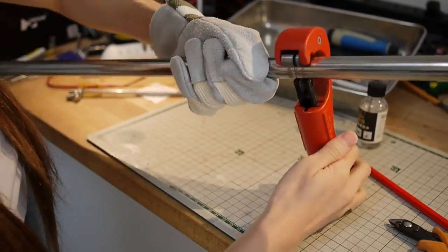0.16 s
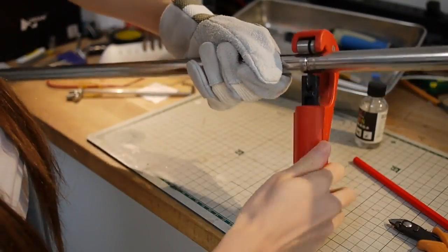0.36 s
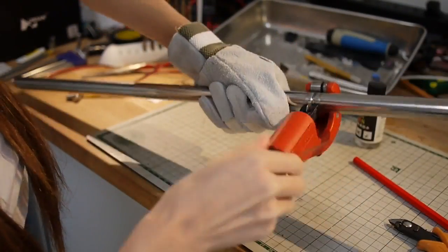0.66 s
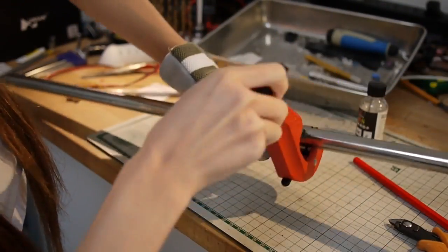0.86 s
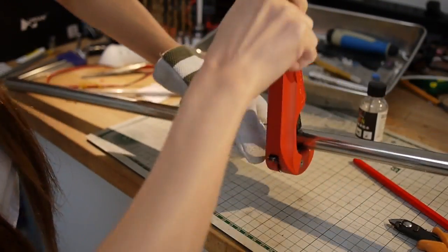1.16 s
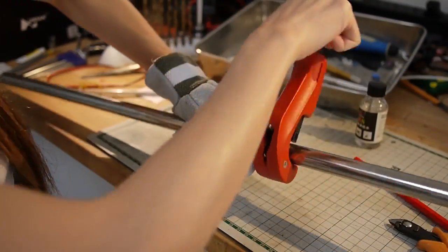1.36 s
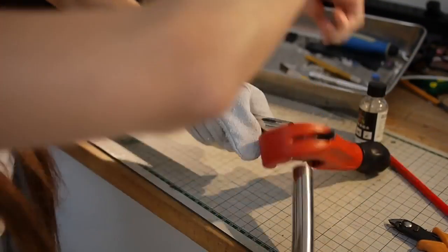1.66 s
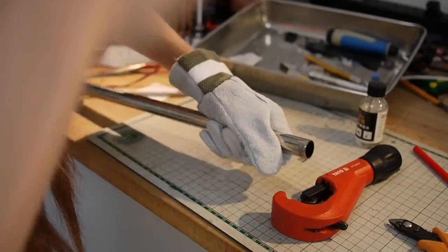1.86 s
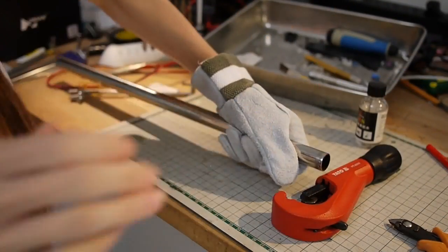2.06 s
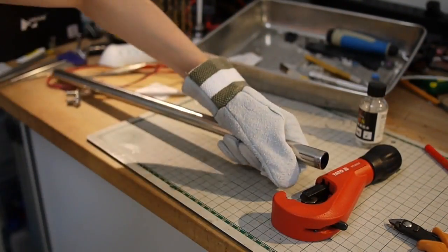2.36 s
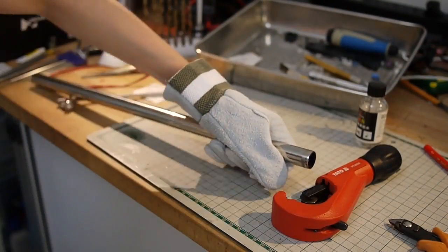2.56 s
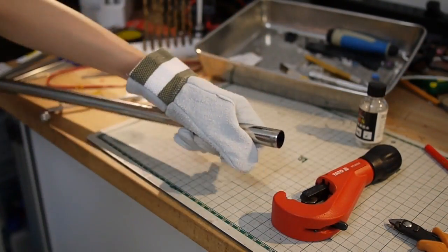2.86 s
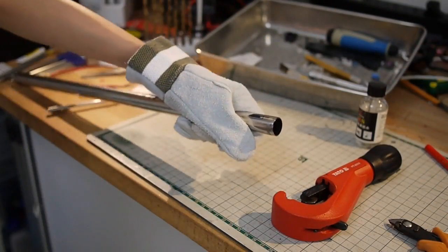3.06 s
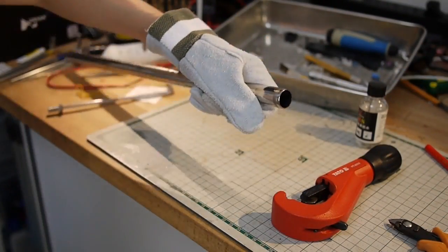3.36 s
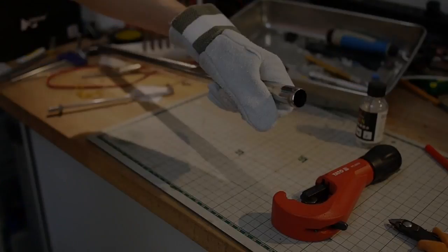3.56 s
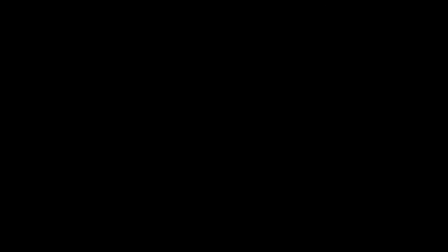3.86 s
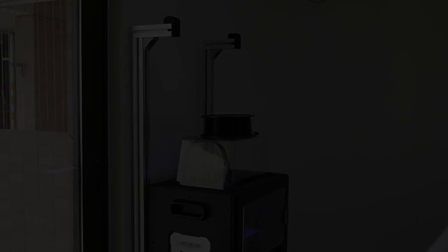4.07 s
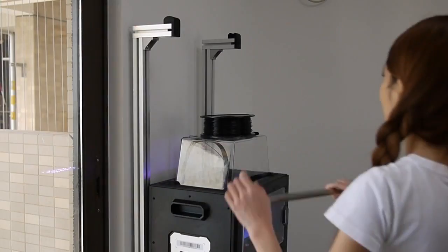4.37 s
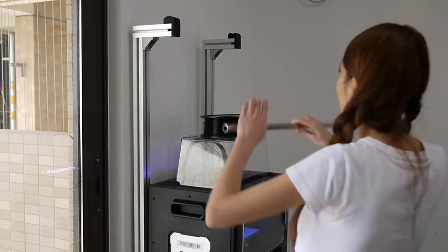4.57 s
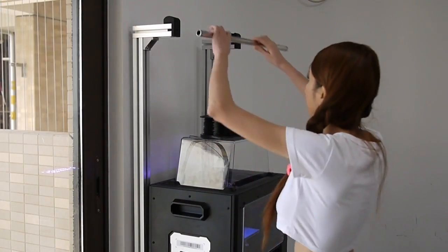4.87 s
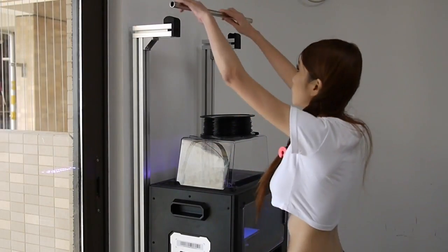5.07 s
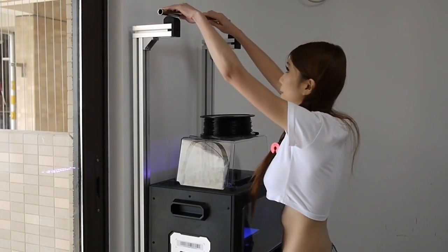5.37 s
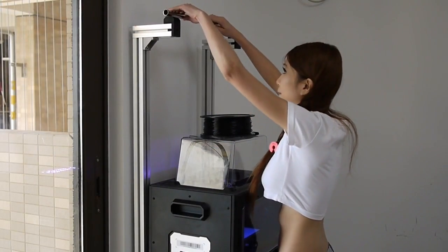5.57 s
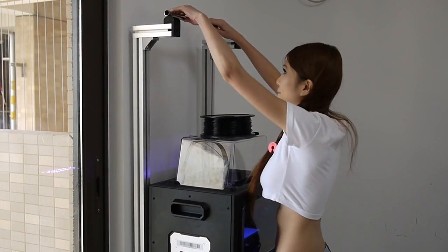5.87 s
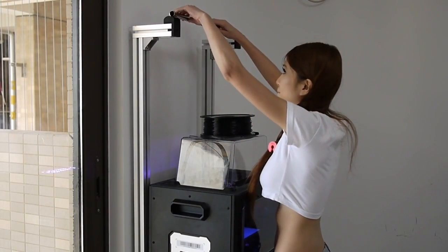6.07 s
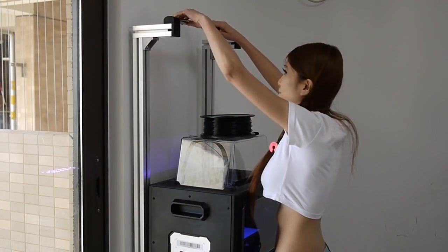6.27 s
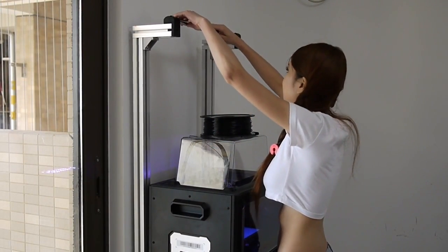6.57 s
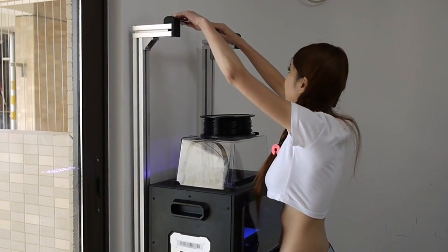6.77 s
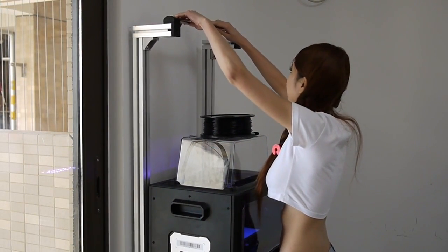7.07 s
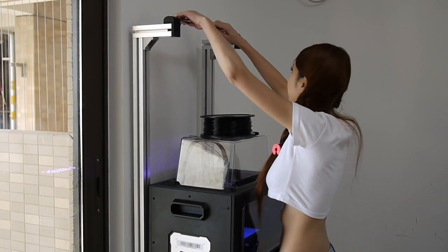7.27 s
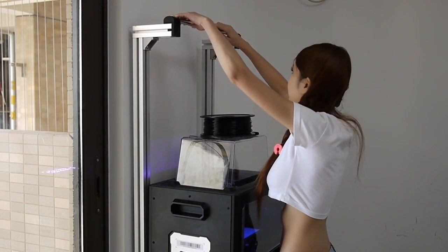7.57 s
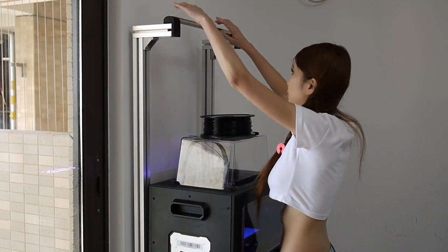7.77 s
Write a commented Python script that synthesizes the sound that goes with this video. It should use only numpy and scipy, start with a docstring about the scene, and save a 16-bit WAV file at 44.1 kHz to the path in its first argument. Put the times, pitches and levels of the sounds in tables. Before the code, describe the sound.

Gritty metal cutting strokes, a bench clatter, a bouncing tube rolling with bright fluttering ringing, then soft reverberant knocks and one snap in a bare room.

```python
"""A rasp comes and goes with sharp clicks, then a clatter, a drop, bounces and a rolling metallic ring.
A hand tube cutter grinds round a steel tube, breaks through and tumbles with it onto a workbench.
The cut-off length bounces and rolls on the floor, ringing with its bending and wall modes.
Then, farther away in a bare room, a tube is fitted onto a metal frame with light knocks.
Filtered noise makes the friction and blows; decaying, fluttering sine modes make the ring."""
import sys
import numpy as np
from scipy import signal
from scipy.fft import rfft, irfft, next_fast_len
from scipy.io import wavfile
from scipy.ndimage import uniform_filter1d, map_coordinates

SR = 44100
rng = np.random.default_rng(int(sys.argv[2]) if len(sys.argv) > 2 else 0)


def put_to_file(sound):
    """Save the sound as 16-bit audio at rate SR, in the file named by the first command-line argument."""
    columns = np.atleast_2d(sound).T  # one column per channel
    safe = np.clip(columns, -1, 1)
    whole_steps = np.round(safe * 32767)
    wavfile.write(sys.argv[1], SR, whole_steps.astype(np.int16))


N = 349272
TIME = np.arange(N) / SR

# the loose tube's modes, one family a line: second bend, first bend, oval, wall, third bend,
# fourth bend, shimmer: (frequency [Hz], relative level [dB])
TUBE_FAMILIES = [
    [(3111, 1.5)],
    [(1151, 2.6)],
    [(4696, -15), (4764, -5.5), (4807, -10.5), (4833, -11), (4909, -14.5), (4955, -10)],
    [(5270, -9), (5320, -1.5), (7838, -8.5), (8539, 1.5)],
    [(5825, 1), (5973, -12.5), (6030, -15)],
    [(7092, -1), (9035, -7), (9075, 2.5), (9117, -10.5), (10212, -15), (10296, -8)],
    [(12172, -5.5), (12274, 2.5), (12694, -5), (13330, -15), (13404, -13), (13534, 0.5), (13975, -19.5),
     (14093, -9), (14427, -22), (14850, -12.5)],
]
# how hard the tube rolls on the floor: (time [s], relative level [dB])
ROLL_FORCE = [(2.2, -33.5), (2.95, -15.5), (3.15, -7), (3.45, -2), (3.72, 0.5), (3.9, -7), (4.02, -25)]


def amp(db):
    """Decibels to gain."""
    return 10 ** (np.asarray(db) / 20)


def unit(x):
    """Scale to rms 1."""
    return x / np.sqrt(np.mean(np.abs(x) ** 2) + 1e-20)


def along(points, hz):
    """Read (Hz, value) points on a log frequency axis."""
    f, v = np.transpose(points)
    return np.interp(np.log(hz + 1), np.log(f + 1), v)


def gains(rows):
    """One gain per sample for each dB column, silent outside the rows."""
    s, *columns = np.transpose(rows)
    curves = [np.interp(TIME, s, column, left=-120, right=-120) for column in columns]
    return [uniform_filter1d(amp(curve), size=64) for curve in curves]


def held(start, attack, end, t60):
    """Attack, hold and release, as a gain; times in seconds."""
    rise = np.clip((TIME - start) / attack, 0, 1)
    return rise * amp(-60 * np.maximum(TIME - end, 0) / t60)


def dying(rows, attack=.002):
    """Gain of (time [s], level [dB], t60 [s]) excitations that die away and add in power."""
    power = np.zeros(N)
    for s, db, t60 in rows:
        first = round(s * SR)
        t = TIME[:N - first][:2 * SR]
        gain = np.minimum(t / attack, 1) * amp(db - 60 * t / t60)
        power[first:first + len(t)] += gain ** 2
    return np.sqrt(power)


def wobble(rate):
    """A smooth random curve, rate knots a second."""
    knots = rng.standard_normal(4096)
    coarse_time = TIME[::32]
    curve = map_coordinates(knots, [coarse_time * rate], mode="wrap")
    return np.interp(TIME, coarse_time, curve)


def coloured(x, spectrum, modes=()):
    """Causal minimum-phase filter: a broad spectrum with resonances standing on it."""
    size = 2 * next_fast_len(len(x) // 2 + 2048)
    hz = np.fft.rfftfreq(size, 1 / SR)
    peaks = 1 + sum(amp(db) ** 2 / (1 + (2 * (hz - f) / width) ** 2) for f, width, db in modes)
    cepstrum = irfft(np.log(amp(along(spectrum, hz)) * np.sqrt(peaks)))
    # folding the cepstrum forward in time makes the response causal
    cepstrum[1:size // 2] *= 2
    cepstrum[size // 2 + 1:] = 0
    return irfft(rfft(x, size) * np.exp(rfft(cepstrum)))[:len(x)]


def grains(rate, spread_db):
    """Tiny slips at random moments, rate a second and of uneven size, rms 1."""
    slips = rng.random(N) < rate / SR
    sizes = rng.standard_normal(N) * amp(spread_db * rng.standard_normal(N))
    return unit(slips * sizes)


def room_tail():
    """A fresh second of reverberation with energy 1; treble dies first."""
    # bare room's decay: (frequency [Hz], t60 [s])
    room_decay = [(150, 0.54), (1000, 0.56), (2500, 0.52), (7000, 0.42), (15000, 0.19)]
    hz, t, z = signal.stft(rng.standard_normal(SR), SR, nperseg=256)
    decayed = z * amp(-60 * t / along(room_decay, hz)[:, None])
    tail = signal.istft(decayed, SR, nperseg=256)[1][:SR]
    return tail / np.linalg.norm(tail)


def blows(rows, spectrum, modes, t60, lead, chatter_db, room_db, size, spot_db=0):
    """Each blow is a brief lead-in, a push, chatter and room answer, levelled over its first size samples."""
    # low, mid and high bands: (lower edge [Hz], upper edge [Hz])
    band_edges = [(80, 1200), (1200, 4000), (4000, 16000)]
    bands = [signal.butter(4, edges, "band", fs=SR, output="sos") for edges in band_edges]
    start = SR // 40  # room for the lead-in ahead of the push
    out, t = np.zeros(N + SR), (np.arange(SR) - start) / SR
    for s, low_db, mid_db, high_db, *spot_hz in rows:
        envelope_db = -60 * np.maximum(t / t60, -t / lead)
        chatter = rng.standard_normal(SR) * amp(4.9 * rng.standard_normal(SR) + envelope_db)
        chatter /= np.linalg.norm(chatter)
        push = t == 0
        answer = np.roll(room_tail(), start)
        force = push + amp(chatter_db) * chatter + amp(room_db) * answer
        # the struck spot may add a hollow resonance of its own
        spot = [(hz, 0.21 * hz, spot_db) for hz in spot_hz]
        body = coloured(force, spectrum, list(modes) + spot)
        # how hard the contact is decides the share of lows, mids and highs
        for band, db in zip(bands, (low_db, mid_db, high_db)):
            part = signal.sosfilt(band, body)
            out[round(s * SR) - start:][:SR] += amp(db) * part / np.std(part[start:start + size])
    return out[:N]


def background():
    """The rush of the room is coloured noise that sinks away while the tube rings."""
    # colour of the rush: (frequency [Hz], density [dB per Hz])
    air_colour = [(15, -58), (25, -22.5), (70, -20), (161, -5.5), (229, -7), (394, -3.5), (659, -6.5),
                  (818, -6.5), (1160, -10.5), (1440, -13), (4030, -24.5), (4370, -26.5), (10700, -32.5),
                  (13200, -28.5), (16000, -32.5)]
    # its fall and return: (time [s], level [dB])
    air_level = [(0, -46.5), (1.35, -48.5), (2.2, -64), (2.9, -58), (3.1, -100), (3.7, -75), (3.93, -51.5),
                 (4.3, -46), (7.92, -47)]
    level, = gains(air_level)
    rush = unit(coloured(rng.standard_normal(N), air_colour))
    return level * rush * amp(0.12 * wobble(7.9))


def frame():
    """Knocks on the distant metal frame and the snap of its bracket arrive mostly as reverberation."""
    # distant knocks; the first row, at 4.02 s, gives the cut tube's last touch on the floor a bright,
    # reverberant answer: (time [s], relative low, mid, high level [dB], spot resonance [Hz])
    taps = [(4.0205, -52.5, -42.5, -41.5, 10200), (4.1908, -73, -48, -52.5, 3060),
            (4.3159, -46.5, -42.5, -53.5, 3140), (4.8107, -60, -39, -57.5, 1630),
            (4.8793, -60, -44, -60, 1750), (5.194, -44, -40, -53, 2050.0),
            (5.2322, -72, -57, -49.5, 9000.0), (5.4332, -39, -34, -55.5, 2300.0),
            (6.0871, -59, -46, -61, 2200.0), (6.1012, -36.0, -31, -50, 2670),
            (6.2876, -35, -30.5, -45.5, 2360), (7.0641, -41, -42.5, -63, 1010),
            (7.1887, -41.5, -37.5, -60, 2030), (7.3795, -40, -37.5, -48, 3106)]
    # the frame's colour: (frequency [Hz], density [dB per Hz])
    frame_colour = [(60, -23), (120, -14), (200, 3.5), (320, -8.5), (750, 5.5), (1400, -7), (2100, -6),
                    (2900, -9.5), (3600, -10.5), (4700, -7.5), (6500, -4.5), (10500, -7), (12500, -9.5),
                    (15500, -35.5)]
    # its resonances: (frequency [Hz], width [Hz], level [dB])
    frame_modes = [(177, 4.9, 19), (217, 4.1, 15), (405, 30, 20.5), (529, 5.5, 11.5), (590, 3.2, 21),
                   (710, 5.3, 10.5), (940, 30, 3.5), (983, 15, 13.5), (1653, 6, 12), (1840, 7.3, 13.5),
                   (2300, 8.1, 13), (2680, 12, 15)]
    # the tube snaps home in its bracket and rebounds: (time [s], relative low, mid, high level [dB])
    seating = [(6.5763, -38, -22.5, -27), (6.5902, -37, -31.5, -35)]
    # the bracket's colour: (frequency [Hz], density [dB per Hz])
    bracket_colour = [(29, -75), (50, -38), (167, -21), (408, -10.5), (439, -23), (483, -10), (822, -14),
                      (1070, -9), (1430, -14), (2160, -1), (3000, -12), (4560, -30.5), (6240, -17.5),
                      (10900, -15), (14500, -37), (16000, -57)]
    # its resonances: (frequency [Hz], width [Hz], level [dB])
    bracket_modes = [(168, 11, 15), (1090, 23, 7), (1790, 40, 6), (2020, 29, -5), (2164, 23, 2),
                     (2228, 15, 10)]
    knocks = blows(taps, frame_colour, frame_modes, t60=0.35, lead=0.04,
                   chatter_db=11.5, room_db=13.0, size=1760, spot_db=9)
    snap = blows(seating, bracket_colour, bracket_modes, t60=0.12, lead=0.0064,
                 chatter_db=13, room_db=18, size=1760)
    return amp(-1.1) * knocks + amp(-1.8) * snap


def bench():
    """Cutter and tube knock on the bench; a sustained low rumble and a bright rattle follow the knocks."""
    # the cutter knocks, the tube parts and both land: (time [s], relative low, mid, high level [dB])
    bench_knocks = [(1.0856, -39.5, -39, -60), (1.428, -34, -25.5, -28.5), (1.494, -24, -16, -26.5),
                    (1.5431, -17, -29, -24.5), (1.6302, -27, -46, -36), (1.7526, -31, -30, -26.5),
                    (1.7597, -21.5, -17.5, -29.5)]
    # colours of the knocks, the low rumble and the bright rattle: (frequency [Hz], density [dB per Hz])
    bench_colour = [(29, -44.5), (50, -29.5), (189, -22), (298, -5), (520, -12), (572, -5.5), (1150, -10),
                    (1240, -7.5), (2880, -12), (3180, -8), (3670, -22), (4790, -14.5), (6550, -13),
                    (9410, -16.5), (16000, -18.5)]
    rumble_colour = [(24, -57), (40, -14.5), (263, -4), (598, -1), (668, -1), (974, 2.5), (1480, -2.5),
                     (2070, -10), (2950, -11.5), (3150, -11), (3940, -16.5), (4800, -16.5), (8000, -25.5),
                     (10400, -44), (17600, -120)]
    rattle_colour = [(2500, -36), (4500, -3.5), (7000, 3), (10000, 5), (14000, -1), (16000, -26)]
    # the bench's resonances: (frequency [Hz], width [Hz], level [dB])
    bench_modes = [(115, 7.5, 9), (592, 36, -7.5), (850, 31.4, 0), (1320, 44, -15.5), (2054, 200, 7.5)]
    tail_start_s = 1.344
    # the rumble dies away after every knock, over a sustained part
    knocked = dying([(s, -32, 0.35) for s, *levels in bench_knocks])
    sustained = amp(-30) * held(tail_start_s, attack=0.27, end=2.011, t60=0.41)
    rumble_level = np.hypot(knocked, sustained)
    rattle_level = amp(-40.5) * held(tail_start_s, attack=0.04, end=1.86, t60=0.34)
    unevenness = amp(2.2 * wobble(45.06))
    rumble_noise = unit(coloured(grains(rate=5000, spread_db=1.5), rumble_colour, bench_modes))
    rattle_noise = unit(coloured(grains(rate=7600, spread_db=-0.5), rattle_colour))
    low_rumble = amp(-0.5) * rumble_level * unevenness * rumble_noise
    bright_rattle = amp(-2.0) * rattle_level * unevenness * rattle_noise
    knocks = blows(bench_knocks, bench_colour, bench_modes, t60=0.05, lead=0.0048,
                   chatter_db=8, room_db=0, size=880)
    return low_rumble + bright_rattle + amp(-0.5) * knocks


def cutter():
    """The wheel grinds along its groove and snaps over burrs; the gloved hand damps the tube."""
    # the wheel and rollers snap on the tube: (time [s], relative low, mid, high level [dB])
    clicks = [(0.4549, -79, -44.5, -37.5), (0.5163, -59, -69, -50.5), (0.6035, -63, -52, -44.5),
              (0.6366, -57, -51, -43.5), (0.6638, -60.5, -57, -52.5), (0.7068, -66.5, -50, -35),
              (1.0481, -52, -39.5, -23.5), (1.3029, -74, -37.5, -27), (1.397, -64, -55.5, -50),
              (1.4093, -50.5, -33, -30.5)]
    # the hand pushes the wheel round: (time of hardest push [s], relative level [dB], length [s])
    strokes = [(.235, -44.5, 0.28), (.5, -41.5, 0.18), (.7, -40, 0.2), (1.19, -44, 0.16),
               (1.45, -31.5, 0.19)]
    # the cutter's colour: (frequency [Hz], density [dB per Hz])
    cutter_colour = [(100, -32.5), (700, -11), (1350, -14.5), (2050, -10.5), (2450, -9.5), (3600, -11),
                     (4150, -16), (4900, -11), (7500, -10), (11500, -11), (13500, -10.5), (16000, -19)]
    # wall modes of the held tube: (frequency [Hz], width [Hz], level [dB])
    gripped_modes = [(4840, 40, 14.5), (5100, 64, 7), (13300, 230, 4.5)]
    edge_db = 20.5  # a stroke's ends lie this far below its middle
    pressure = sum(amp(db - edge_db * np.abs(TIME - s) / (length / 2)) for s, db, length in strokes)
    grinding = unit(coloured(grains(rate=5300, spread_db=4.5), cutter_colour, gripped_modes))
    rasp = grinding * pressure * amp(0.5 + 1.5 * wobble(40))
    snaps = blows(clicks, cutter_colour, gripped_modes, t60=0.04, lead=.008,
                  chatter_db=5.0, room_db=0.5, size=880)
    return rasp + amp(1.1) * snaps


def rolling():
    """The tube's rim clicks on the hard floor, skids and grinds over grit, coloured by the tube's modes."""
    # the tube touches the floor and skids: (time [s], relative low, mid, high, skid level [dB])
    bounces = [(2.152, -28.5, -34, -12.5, -57), (2.169, -74, -46, -22, -53.5),
               (2.4917, -44, -38.5, -42.5, -47.5), (2.586, -45, -46, -49, -53),
               (2.6905, -22, -32, -35.5, -63), (2.7697, -42, -28, -50, -44), (2.899, -33.5, -40, -38, -41),
               (2.9311, -52, -36, -48, -38.5), (3.0433, -62, -40.5, -47.5, -48),
               (3.1045, -81, -47, -27, -47), (3.2693, -87, -39, -38.5, -38), (3.308, -88, -47.5, -39, -51),
               (3.3962, -77, -54, -32, -46), (3.404, -82, -56.5, -35, -46), (3.4861, -77, -76, -52, -54),
               (3.5483, -85, -48, -42, -56), (3.999, -59, -63, -36.5, -73), (4.02, -62, -36, -38.5, -72)]
    # colours of the floor contacts, the rim's scrape and the fine grit: (frequency [Hz], density [dB per Hz])
    floor_colour = [(60, -11.5), (150, -30.5), (300, -9.5), (480, -1), (700, -1.5), (1100, 10), (2500, 13),
                    (4000, -6), (7000, 0.5), (10500, 0.5), (14000, -11), (16000, -14.5)]
    scrape_colour = [(150, -56), (600, -37.5), (1500, -25.5), (2800, 23.5), (4000, 18), (6500, 18),
                     (9000, -9.5), (14000, -45.5)]
    fine_colour = [(4000, -52), (7000, -1), (9500, 12.5), (11500, 0.5), (14500, 9.5), (16000, -19.5)]
    roll, = gains(ROLL_FORCE)
    skid = dying([(s, skid_db, 0.38) for s, *levels, skid_db in bounces], attack=.006)
    # sharp, bright contacts kick up fine grit; their highs count only up to a top level
    spray_top_db, spray_db, spray_t60_s = -34, -7, 0.3
    spray = dying([(s, min(high_db, spray_top_db) + spray_db, spray_t60_s)
                   for s, low_db, mid_db, high_db, skid_db in bounces])
    scrape = np.hypot(amp(-50.5) * roll, skid)
    fine = np.hypot(amp(-50.5) * roll, spray)
    stirred = [(hz, 0.0079 * hz, 11.5 + 0.52 * db) for family in TUBE_FAMILIES for hz, db in family]
    rim_noise = unit(coloured(grains(rate=6700, spread_db=3.5), scrape_colour, stirred))
    grit_noise = unit(coloured(grains(rate=8600, spread_db=2.5), fine_colour, stirred))
    contacts = [row[:-1] for row in bounces]
    bends = [(hz, 0.07 * hz, 10) for hz, db in TUBE_FAMILIES[0] + TUBE_FAMILIES[1]]
    rim_clicks = blows(contacts, floor_colour, bends, t60=0.018, lead=.001,
                       chatter_db=2.5, room_db=-4.5, size=880)
    return amp(10.0) * scrape * rim_noise + amp(10.0) * fine * grit_noise + amp(-2.5) * rim_clicks


def struck_anew(times, dbs, t60s):
    """Gain of a ring that dies away until the next blow replaces it."""
    gain = np.zeros(N)
    for s, db, t60 in zip(times, dbs, t60s):
        first = round(s * SR)
        gain[first:] = amp(db - 60 * TIME[:N - first] / t60)
    return uniform_filter1d(gain, size=64)


def ring_levels():
    """One gain for each family of modes, from blows that die away and from rolling or set level curves."""
    # blows restart the oval, wall, third, fourth and shimmer rings, and add to the second bend:
    # (time [s], relative second bend, oval, wall, third bend, fourth bend level [dB],
    # t60 at the reference pitch [s])
    strikes = [(1.647, -32.5, -27.5, -42, -35.5, -31, 1), (1.76, -39, -45, -49, -47, -41, 0.73),
               (2.152, -41, -38, -50, -37, -28.5, 1.6), (2.694, -44, -48, -28, -24.5, -25.5, 0.6),
               (2.769, -19, -47, -36, -27, -33, 0.49), (2.931, -16, -55, -36, -20, -38, 0.42),
               (3.047, -17, -47, -49, -19.5, -30.5, 0.2), (3.269, -22, -35, -36.5, -22, -57, 0.8),
               (3.485, -17, -47, -39, -23, -55, 0.81)]
    # the second bend carries the ring: (time [s], relative level [dB])
    second_bend = [(1.64, -33), (1.65, -39.5), (2.13, -39.5), (2.15, -43), (2.23, -35.5), (2.27, -24.5),
                   (2.34, -31.5), (2.45, -24), (2.73, -30.5), (2.85, -13.5), (2.88, -22.5), (3.44, -26),
                   (3.49, -24), (3.55, -27.5), (3.59, -21.5), (3.74, -32.5), (3.77, -27), (4.02, -53)]
    # the first bend hums and swells: (start [s], relative level [dB], attack [s], end of hold [s], t60 [s])
    bend_swells = [(1.946, -44.5, 0.13, 2.98, 4.15), (2.36, -29.5, 0.11, 2.677, 1.01),
                   (2.745, -16.5, 0.032, 2.772, 0.08)]
    # rolling feeds the wall, third bend, fourth bend and shimmer: relative level [dB]
    roll_ring = [-42.5, -28.5, -35.5, -42.5]
    roll, = gains(ROLL_FORCE)
    # the oval modes swell once a turn, when they face the microphone
    turn_s, facing_s, swing_db = 0.63, 3.18, 10
    turning = amp(-41 + swing_db * np.cos(2 * np.pi * (TIME - facing_s) / turn_s))
    fed = [turning * held(start=2, attack=0.1, end=3.9, t60=0.55)]
    # the families above are fed unevenly
    fed += [roll * amp(db + 1.5 * wobble(4.76)) for db in roll_ring]
    times, second, oval, wall, third, fourth, t60 = np.transpose(strikes)
    kicks = dying([(s, db, 0.22) for s, db in zip(times, second)])  # the second bend's extra ring
    first = np.linalg.norm([amp(db) * held(s, *shape) for s, db, *shape in bend_swells], axis=0)
    levels = [np.hypot(gains(second_bend)[0], kicks), first * amp(1.6 * wobble(13))]
    shimmer = fourth - 6.5
    fade = held(start=0, attack=.01, end=3.92, t60=.25)
    reference_hz, slope = 7200, 1.8  # higher modes die sooner by this power
    for family, struck_db, rolled in zip(TUBE_FAMILIES[2:], (oval, wall, third, fourth, shimmer), fed):
        centre_hz = np.mean([hz for hz, db in family])
        struck = struck_anew(times, struck_db, t60 * (reference_hz / centre_hz) ** slope)
        levels.append(np.hypot(struck * fade, rolled))
    return levels


def flutter(hz, depth):
    """The turning tube sweeps modes through the room's standing waves: higher ones flutter faster and deeper."""
    rate = 21 * (hz / 3000) ** .7
    slow = wobble(rate) + 1j * wobble(rate)
    fast = wobble(3 * rate) + 1j * wobble(3 * rate)
    echoes = depth * (hz / 3000) ** 0.32 * (slow + 1.08 * fast)
    # the moving tube smears each mode's phase [rad]
    phase = 0.7 * np.sqrt(hz / 3000) * wobble(15)
    field = (1 + echoes) * np.exp(1j * phase)
    power = np.abs(uniform_filter1d(np.abs(field) ** 2, size=3600))
    return field / np.sqrt(power + 1e-6)


def ringing():
    """The tube's families of modes ring as sines and flutter as it turns."""
    out = np.zeros(N)
    for family, level in zip(TUBE_FAMILIES, ring_levels()):
        on = level > amp(-110)
        for hz, db in family:
            # each mode's level wavers slowly at random, more so at higher pitch
            share = amp(db + hz / 4500 * (wobble(8) - 1.56))
            envelope = share * level * flutter(hz, depth=0.48)
            out[on] += np.real(envelope[on] * np.exp(2j * np.pi * hz * TIME[on]))
    return out


def scene():
    """All sources reach one microphone, alike in both channels."""
    mono = background() + frame() + bench() + cutter() + rolling() + amp(3.5) * ringing()
    return np.array([mono, mono])


def record(dry):
    """Peaks clip at full scale, then everything from the band limit up is removed."""
    top_hz = 16000
    size = next_fast_len(N + 4096)
    hz = np.fft.rfftfreq(size, 1 / SR)
    return irfft(rfft(np.clip(dry, -1, 1), size) * (hz < top_hz), size)[:, :N]


dry = scene()
out = record(dry)
put_to_file(out)
```